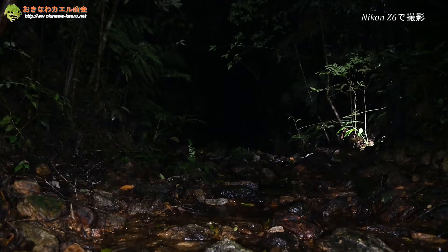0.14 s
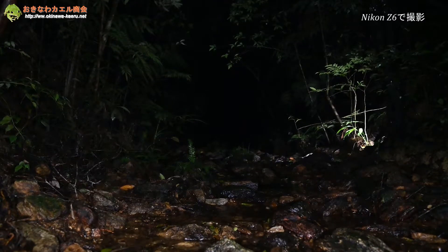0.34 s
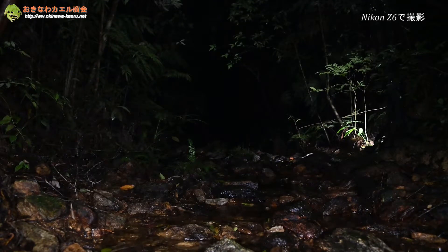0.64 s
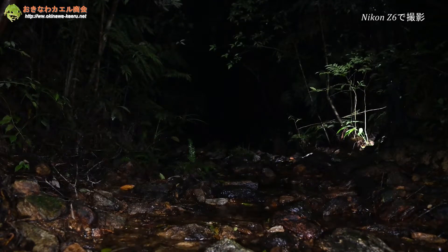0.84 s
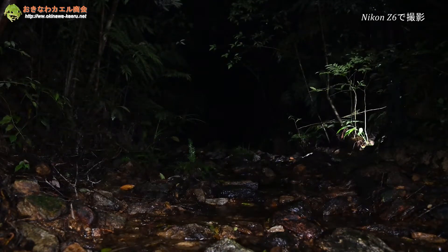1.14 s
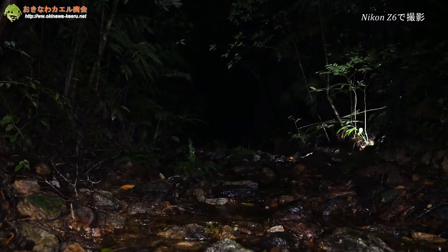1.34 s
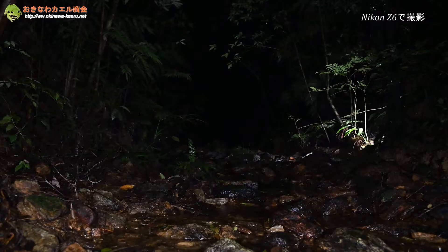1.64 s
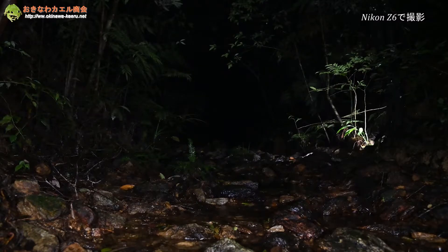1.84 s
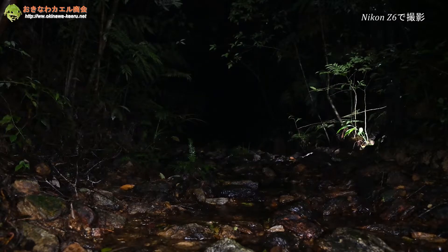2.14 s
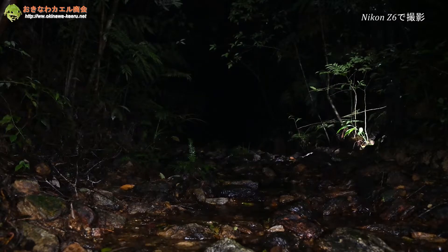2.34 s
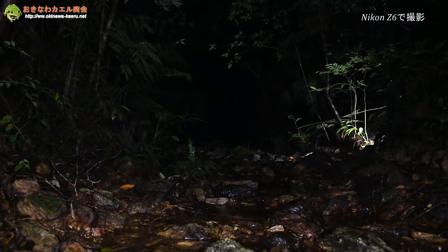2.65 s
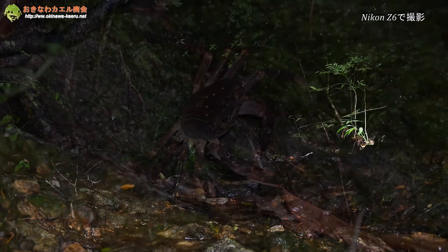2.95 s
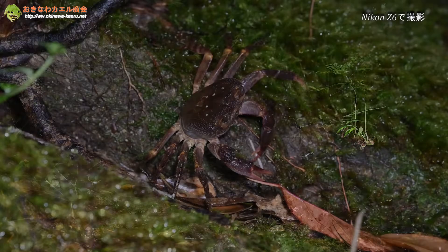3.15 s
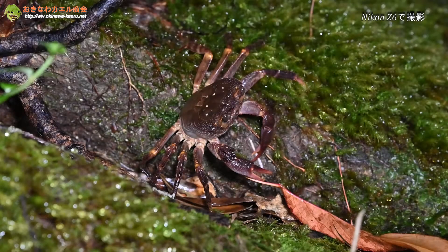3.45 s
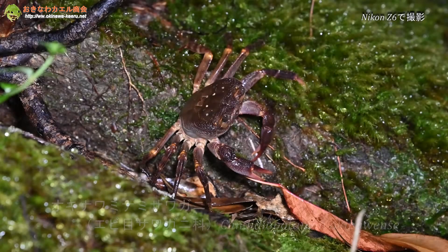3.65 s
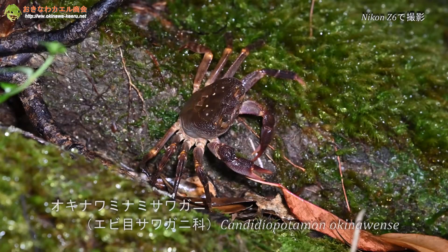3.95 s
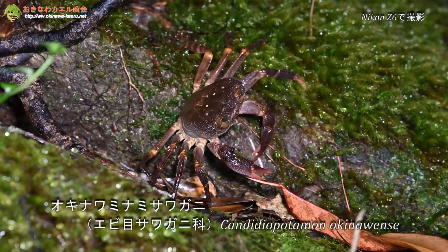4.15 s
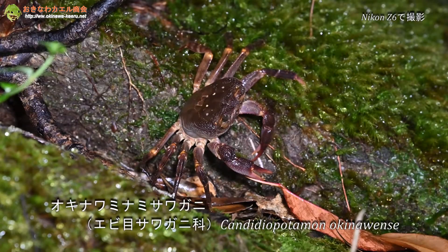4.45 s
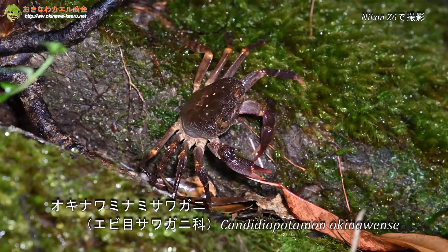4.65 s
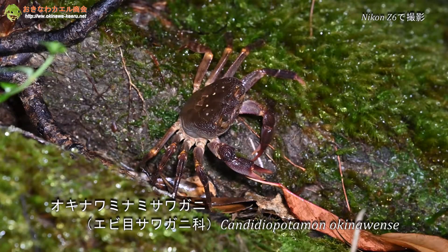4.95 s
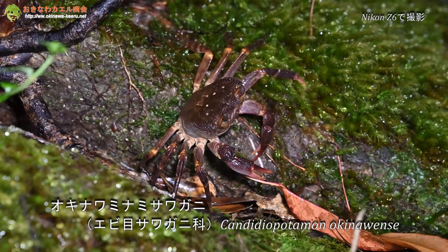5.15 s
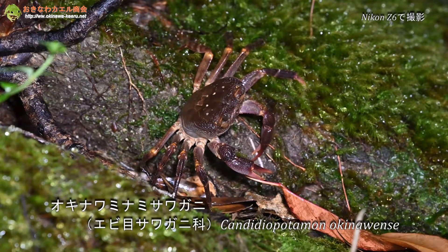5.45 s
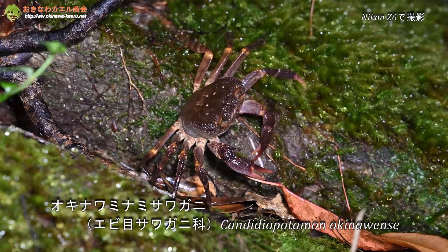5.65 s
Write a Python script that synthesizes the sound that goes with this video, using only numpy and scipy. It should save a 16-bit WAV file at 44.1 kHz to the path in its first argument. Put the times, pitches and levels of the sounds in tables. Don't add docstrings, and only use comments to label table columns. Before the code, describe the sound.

Overlapping cricket trills fill the opening, bright and shimmering, slightly left of centre, over katydid buzz, creek hiss and clear bubble notes. A thin steady whistle sits very high. Around three seconds everything drops away to a hushed streamside: small watery blips on the right, soft low glugs in the centre, distant insects, and little else.

```python
import sys
import numpy as np
from scipy import signal
from scipy.fft import rfft, irfft, next_fast_len
from scipy.io import wavfile
from scipy.ndimage import uniform_filter1d, map_coordinates

SR = 44100
rng = np.random.default_rng(int(sys.argv[2]) if len(sys.argv) > 2 else 0)


def ratio_of_db(decibels):
    return 10 ** (np.asarray(decibels, float) / 20)


def master_out(mix):
    frames = np.transpose(np.atleast_2d(mix))
    ceiling = np.clip(frames, -1, 1)
    pcm = np.round(ceiling * 32767).astype(np.int16)
    wavfile.write(sys.argv[1], SR, pcm)


N = 255339
T = np.arange(N) / SR
SIZE = next_fast_len(N + 9000, real=True)
HZ = np.fft.rfftfreq(SIZE, 1 / SR)


def evened(x):
    return x / np.sqrt(np.mean(np.atleast_2d(x).mean(0) ** 2) + 1e-20)


def read(points, hz):
    f, value = np.transpose(points)
    return np.interp(np.log(hz + 1), np.log(f + 1), value)


def sides(pan_db):
    return ratio_of_db(np.array([[pan_db / 2], [-pan_db / 2]]))


def wander(per_s):
    coarse = T[::64]
    slow = map_coordinates(rng.standard_normal(400), [np.clip(coarse * per_s, 0, 399)], order=3)
    return np.interp(T, coarse, evened(slow))


def fader(full_s, silent_s, power):
    return np.clip((T - silent_s) / (full_s - silent_s), 0, 1) ** power


def coloured(x, points):
    return evened(irfft(rfft(x, SIZE) * ratio_of_db(read(points, HZ)), SIZE)[..., :N])


def ringing(x, hz, width_hz, steep=1.26):
    resonance = (1 + (2 * (HZ - hz) / width_hz) ** 2) ** steep
    return evened(irfft(rfft(x, SIZE) / resonance, SIZE)[..., :N])


def forest(x, pan_db, echo_db, lag, t60=0.36):
    t = np.arange(9000) / SR
    path = rng.standard_normal((2, len(t))) * ratio_of_db(-60 * t / t60) * (t > .003)
    path *= ratio_of_db(echo_db) / np.linalg.norm(path[0])
    path[0, lag] = path[1, 0] = 1
    heard = irfft(rfft(x, SIZE) * rfft(path, SIZE), SIZE)[:, :N]
    return evened(sides(pan_db) * heard)


def singing(songs):
    swell_s, stop_s = .22, .05
    gains = np.zeros((4, N))
    for group, start, stop, db in songs:
        swell = fader(start + swell_s, start, 0.79)
        gains[int(group)] += ratio_of_db(db) * swell * fader(stop - stop_s, stop, 0.86)
    return gains


def crickets(wings, songs, far, pan_db, lag, uneven, rise_s, sag_hz):
    groups = np.zeros((4, 2, N))
    for group, hz, per_s, chirps, echo_db in wings:
        turns = np.cumsum(per_s * (1 + 0.301 * uneven * wander(12))) / SR + rng.random()
        since = turns % 1 / (per_s * rise_s)
        chirp = 1 - 0.54 * np.sin(np.pi * chirps * T + .3) ** 2
        stroke = since ** 2 * np.exp(-2 * since) * chirp
        pitch = hz + sag_hz * (1 - since) + 70 * uneven * wander(6)
        tone = np.sin(2 * np.pi * np.cumsum(pitch) / SR)
        groups[int(group)] += forest(stroke * ratio_of_db(3.6 * uneven * wander(24.84)) * tone, pan_db, echo_db, lag)
    far_hz, far_width_hz, far_db = far
    crowd = ratio_of_db(far_db) * ringing(rng.standard_normal((2, N)) * sides(pan_db), far_hz, far_width_hz)
    return crowd + sum(evened(g) * level for g, level in zip(groups, singing(songs)))


def purr(hz, width_hz, per_s, depth):
    throb = 1 - depth + 3 * depth * np.sin(np.pi * per_s * T + .4) ** 6
    ring = ringing(rng.standard_normal(N) * throb, hz, width_hz, steep=0.93)
    return forest(ring, pan_db=-.3, echo_db=-2.3, lag=0, t60=.15)


def katydids(spectrum, pan_db, crowd_db):
    clicks = rng.standard_normal((3, N)) * ratio_of_db(0.55 * wander(22.99) + .5 * wander(60))
    teeth = coloured(clicks, spectrum)
    near = forest(teeth[0], pan_db, echo_db=1.04, lag=1, t60=0.23)
    return evened(near + ratio_of_db(crowd_db) * evened(teeth[1:] * sides(pan_db)))


def water(spectrum, same, pan, patchy_db, flicker_db, lag=0):
    frames, hz = N // 128 + 5, np.fft.rfftfreq(512, 1 / SR)
    a, b, c, d, chance = rng.standard_normal((frames, 257, 5)).T
    flicker = uniform_filter1d(chance, size=30, axis=0)
    patches = uniform_filter1d(uniform_filter1d(chance, size=4, axis=0), size=6, axis=1)
    gurgle = np.exp(-(np.log(hz[:, None] / 1400 + 1e-9) / 1.1) ** 2)
    like = np.clip(read(same, hz), -1, 1)[:, None]
    left = a + 1j * b
    z = np.array([left, like * left + np.sqrt(1 - like ** 2) * (c + 1j * d)])
    z *= ratio_of_db(gurgle * (patchy_db * patches / patches.std() + flicker_db * flicker / flicker.std()))
    z *= ratio_of_db(np.array([.5, -.5])[:, None, None] * read(pan, hz)[:, None])
    z[0] *= np.exp(-2j * np.pi * lag / SR * hz ** 3 / (hz ** 2 + 500 ** 2))[:, None]
    return coloured(signal.istft(z, nperseg=512, noverlap=384)[1][:, :N], spectrum)


def whistle(db, pan_db, lead):
    turn = 2 * np.pi * 15688 * T
    tone = np.sin([turn + lead + 0.057 * wander(3.7), turn])
    return np.sqrt(2) * ratio_of_db(db + .4 * wander(8)) * sides(pan_db) * tone


def creek_side():
    # group (0-3), wing_hz, strokes_per_s, chirps_per_s (0 for none), echo_db
    wings = [(0, 3490, 37, -1.5, -3), (0, 3660, 52, -2, 3), (1, 3752, 43, -1, 12), (1, 3820, 78, 11, 14),
             (2, 3890, 44.5, 0, 3.5), (3, 3999, 39, 0.5, 2.5), (3, 4064, 65, 1.5, 6)]
    songs = [
        (0, .15, 1.12, -27.5),
        (0, 1.2, 1.727, -28),
        (1, .55, 1.25, -25.5),
        (1, 1.2, 2.02, -19.7),
        (2, -.3, 0.723, -23),
        (2, 1.75, 4.1, -21.5),
        (3, -.3, .8, -29),
        (3, .65, 1.95, -27),
        (0, 1.9, 3.1, -29),
    ]
    # pitch_hz, level_db (per Hz)
    rasp = [(4300, -40.5), (5000, -27.5), (5360, -18.5), (6170, -17.5), (6620, -12), (6950, -.5), (7230, 0),
            (8470, -3.5), (9420, -12.5), (11000, -21.5), (11800, -22), (12300, -27), (14300, -31),
            (15600, -22)]
    # pitch_hz, level_db (per Hz)
    hiss = [(20, 1), (50, 1.5), (150, 2.5), (300, -1), (800, 0.5), (1500, 1), (2100, -7.5), (3200, -1),
            (4300, 2), (4800, -6), (6000, -3), (12000, -15), (16000, -11.5)]
    # pitch_hz, likeness (0-1)
    same = [(120, 1), (240, .99), (450, .9), (950, .33), (1500, .2), (2000, .35), (5000, .17), (15000, .05)]
    # pitch_hz, left_right_db
    pan = [(60, 0), (1200, .3), (2500, 0.037), (8000, 1.3)]
    place = crickets(wings, songs, far=(3845, 410, -21.8),
                     pan_db=2.3, lag=8, uneven=.4, rise_s=.003, sag_hz=24.75)
    place += ratio_of_db(-28) * purr(hz=2590, width_hz=430, per_s=22, depth=0.1)
    place += ratio_of_db(-16.5) * katydids(rasp, pan_db=1.5, crowd_db=-4.5)
    place += ratio_of_db(-31) * water(hiss, same, pan, patchy_db=1.86, flicker_db=0.44)
    return place + whistle(db=-26.5, pan_db=2.4, lead=-.26)


def bubbles(rows, trim_db, t60, pan_db, rise, lag=0):
    out, t = np.zeros((2, N + 6000)), np.arange(6000) / SR
    for s, db, hz in rows:
        tone = np.sin(2 * np.pi * hz * t * (1 + rise * t / t60))
        ring = tone * ratio_of_db(db + trim_db - 60 * t / t60) * (1 - np.exp(-t * hz / 2.25))
        out[:, round(s * SR):][:, :len(t)] += ring * sides(pan_db)
    bank = .5 * np.array([np.roll(out[1], 310), -np.roll(out[0], 190)])
    return (np.array([np.roll(out[0], lag), out[1]]) + bank)[:, :N]


def drops():
    # start_s, peak_db, pitch_hz
    creek = [(0.087, -20.5, 725), (0.158, -22, 690), (0.284, -20, 1110), (0.479, -16, 741.6),
             (0.537, -21, 786), (0.71, -24, 796), (0.831, -19, 1842), (1.022, -23, 1500),
             (1.345, -21, 1226), (1.407, -19, 1405), (1.504, -21, 710), (1.575, -23, 1290),
             (1.789, -18, 1780), (1.858, -22, 1220), (1.991, -19, 1470), (2.33, -25, 1200)]
    # start_s, peak_db, pitch_hz
    low = [(2.9, -38, 385), (3.011, -38, 380), (3.4, -33, 503), (3.494, -40, 557), (3.67, -33, 370),
           (3.783, -35, 570), (3.821, -32, 336), (3.887, -31, 387), (4.179, -29, 460), (4.345, -29.5, 380),
           (4.43, -31, 450), (4.499, -30, 557), (4.643, -24.5, 527), (5.242, -36, 365), (5.384, -34, 537),
           (5.425, -27, 498), (5.528, -36, 557)]
    # start_s, peak_db, pitch_hz
    twig = [
        (3.277, -23, 5100),
    ]
    # start_s, peak_db, pitch_hz
    high = [(3.3557, -27, 1550), (3.486, -28, 1580), (3.5987, -21, 1620), (3.8017, -25, 2260),
            (3.898, -23, 1150), (3.9295, -23, 1120), (3.9364, -18, 1550), (3.9955, -24, 1150),
            (4.1594, -21, 1550), (4.2258, -24, 1830), (4.3231, -27, 1100), (4.5191, -23, 1250),
            (4.5825, -22, 990), (4.6598, -25, 1050), (4.8304, -21, 1550), (4.8828, -24, 1900),
            (4.9222, -20, 1830), (5.0629, -29, 1530), (5.0958, -23, 1700), (5.1347, -26, 1870),
            (5.1731, -27, 1670), (5.2255, -25, 1500), (5.3906, -26, 2110), (5.443, -26, 2180),
            (5.4655, -26, 2200), (5.5014, -26, 1540), (5.5318, -23.5, 1490), (5.6141, -26, 1600)]
    out = bubbles(creek, trim_db=-6, t60=.06, pan_db=-.4, rise=.11)
    out += bubbles(low, trim_db=-1.2, t60=.08, pan_db=0, rise=.11)
    out += bubbles(twig, trim_db=0, t60=.01, pan_db=0, rise=.1)
    return out + bubbles(high, trim_db=-1.3, t60=.023, pan_db=-12, rise=.22, lag=5)


def rasps():
    # start_s, length_s, pitch_hz, level_db, left_right_db
    bursts = [
        (.78, .25, 14900, -37, .3),
        (1.117, .12, 14500, -34, -1),
        (1.42, .1, 13800, -45, .3),
        (1.66, .11, 14300, -40, .3),
        (1.91, .12, 13900, -43, .3),
        (2.733, .09, 14300, -59, .3),
        (4.85, .18, 14700, -51, -10),
    ]
    out = np.zeros((2, N))
    for s, length, hz, db, pan_db in bursts:
        swell = np.sin(np.pi * np.clip((T - s) / length, 0, 1)) ** .7
        out += ratio_of_db(db) * swell * ringing(rng.standard_normal((2, N)) * sides(pan_db), hz, 1300)
    return out


def hollows():
    # pitch_hz, width_hz, level_db
    pockets = [(210, 36, -63.5), (380, 50, -58), (557, 50, -56.5)]
    out = 0
    for hz, width_hz, db in pockets:
        out = out + ratio_of_db(db + 3.7 * wander(11)) * ringing(rng.standard_normal(N), hz, width_hz)
    return out


def trickle_side():
    # group (0-3), wing_hz, strokes_per_s, chirps_per_s (0 for none), echo_db
    wings = [(0, 3334, 62, 1, 15), (0, 3453, 56.5, -2, -4), (0, 3600, 70.2, -2, 9),
             (1, 3807, 45.46, -0.5, 5), (2, 3945, 60.2, 15, -.3), (2, 3963, 43.5, -1, 5)]
    songs = [
        (0, 3.8, 3.9, -55),
        (0, 4.55, 5.14, -41),
        (1, 3.59, 4.1, -42),
        (1, 4.0, 4.62, -38),
        (1, 4.57, 4.7, -43),
        (2, 4.15, 4.5, -46),
        (2, 4.62, 5.22, -37.5),
        (2, 5.4, 5.9, -47),
    ]
    # pitch_hz, level_db (per Hz)
    rasp = [(3590, -18.5), (6100, -14), (6870, -1), (7520, 2), (7870, 0.5), (8710, -7), (10500, -17.5),
            (13600, -43), (22000, -120)]
    # pitch_hz, level_db (per Hz)
    hiss = [(20, -14), (60, -10.5), (130, -12.5), (250, -9), (500, -4), (850, -6), (1200, -2), (1400, -1.5),
            (1650, 0), (2300, 0.8), (3100, 0), (4600, -5), (9000, -13.5), (16000, -14.5)]
    # pitch_hz, likeness (0-1)
    same = [(300, 1), (900, .8), (1500, .7), (2100, .62), (2600, .35), (4000, .15), (9000, .03)]
    # pitch_hz, left_right_db
    pan = [(400, -.2), (900, -3.7), (1500, -5.5), (2000, -4), (2600, -1.7), (5000, -1.4), (12000, .1)]
    place = crickets(wings, songs, far=(3887, 400, -42),
                     pan_db=.6, lag=5, uneven=.33, rise_s=.0032, sag_hz=24.9)
    place += ratio_of_db(-39) * katydids(rasp, pan_db=2.9, crowd_db=1.2)
    place += whistle(db=-39.5, pan_db=.4, lead=2.2)
    place += ratio_of_db(-37.6) * water(hiss, same, pan, patchy_db=2.5, flicker_db=1.9, lag=4)
    return place + hollows()


def scene():
    loud = creek_side() * fader(full_s=1.916, silent_s=3.03, power=1.99)
    quiet = trickle_side() * fader(full_s=3.43, silent_s=2.694, power=0.78)
    return loud + quiet + drops() + rasps()


def masked(x):
    # from_hz, to_hz, neighbour_from_hz, neighbour_to_hz, gap_db
    hidden = [(4250, 4500, 3500, 4200, 19.5), (4500, 4800, 3500, 4200, 23.8), (4800, 5130, 3500, 4200, 25),
              (14500, 14850, 15600, 15760, 25.2), (14850, 15200, 15600, 15760, 24.8),
              (15200, 15560, 15600, 15760, 22.5)]
    memory_frames, gap_scatter_db, top_hz = 7, 1.8, 15770
    hz, _, z = signal.stft(x, SR, nperseg=2048, noverlap=1024)
    power = (abs(z) ** 2).mean(0)
    keep = np.ones(power.shape)
    for lo, hi, near_lo, near_hi, gap_db in hidden:
        band = (hz >= lo) & (hz < hi)
        near = power[(hz >= near_lo) & (hz < near_hi)].mean(0)
        before = np.convolve(near, np.ones(memory_frames) / memory_frames)[:len(near)]
        gap = ratio_of_db(2 * (gap_db + gap_scatter_db * rng.standard_normal(len(near))))
        keep[band] = power[band].mean(0) * gap > np.maximum(near, before)
    kept = z * keep * (hz < top_hz)[:, None]
    return signal.istft(kept, SR, nperseg=2048, noverlap=1024)[1][:, :N]


def band_limit(x):
    return signal.sosfilt(signal.butter(12, 15850, fs=SR, output="sos"), x)


def record(dry):
    mix = masked(np.clip(dry, -.95, .95))
    return band_limit(mix)


dry = scene()
out = record(dry)
master_out(out)
```